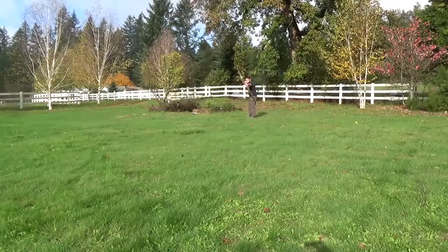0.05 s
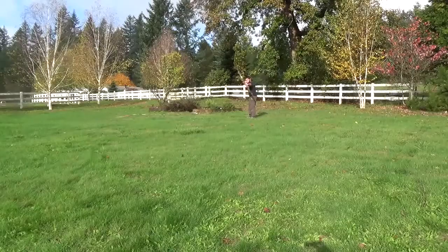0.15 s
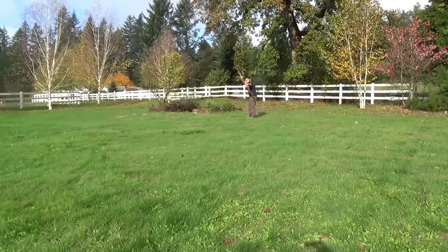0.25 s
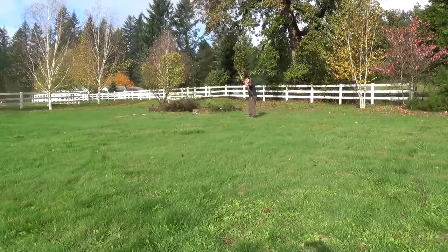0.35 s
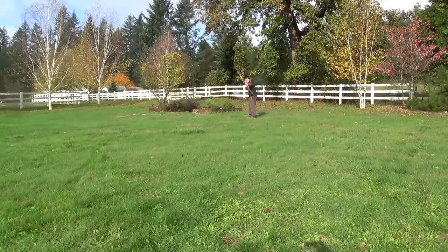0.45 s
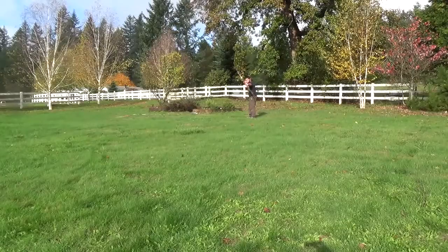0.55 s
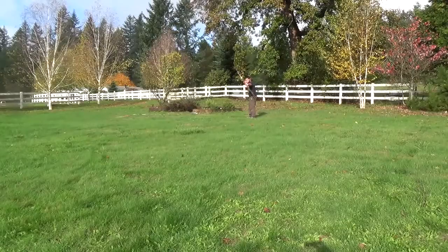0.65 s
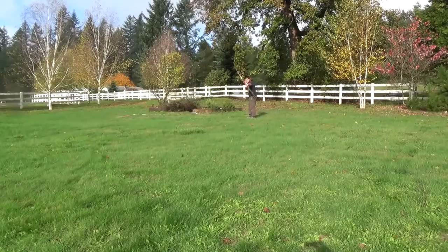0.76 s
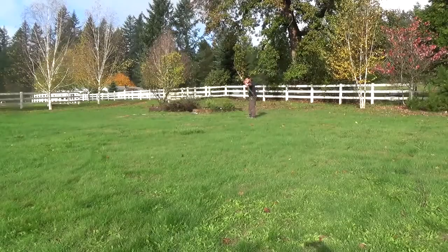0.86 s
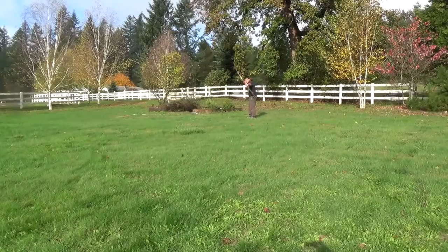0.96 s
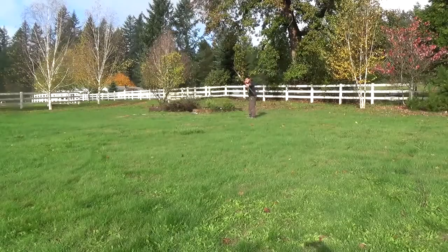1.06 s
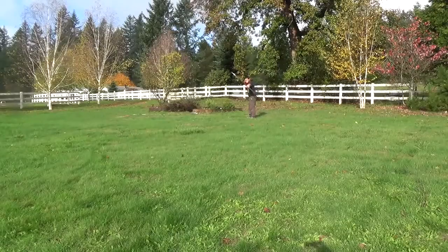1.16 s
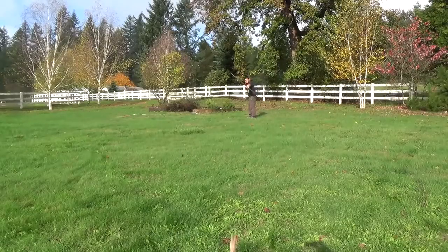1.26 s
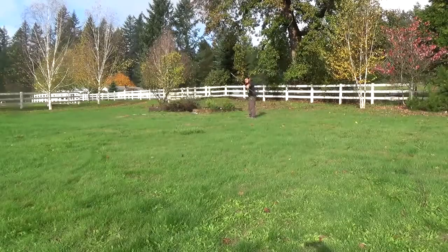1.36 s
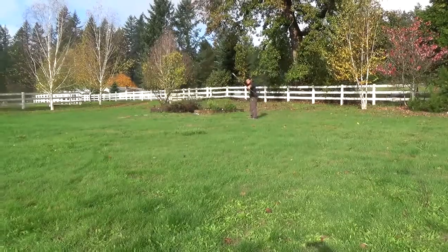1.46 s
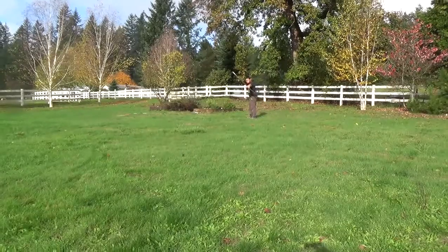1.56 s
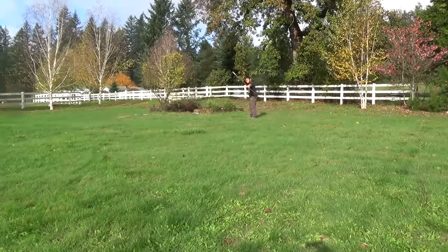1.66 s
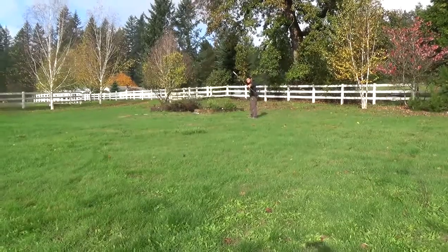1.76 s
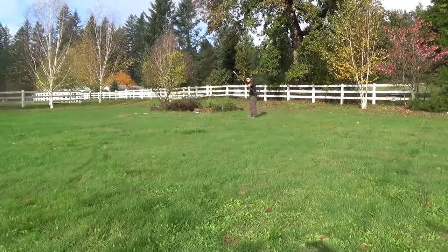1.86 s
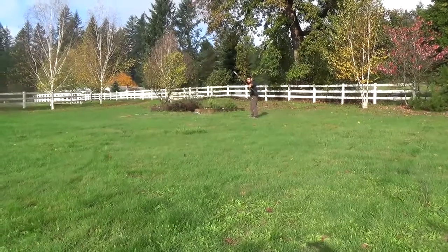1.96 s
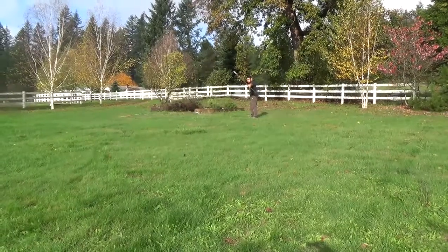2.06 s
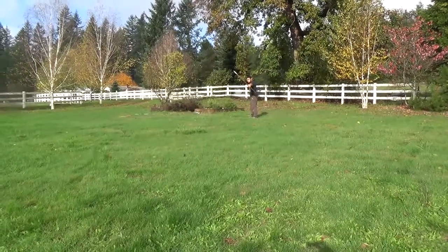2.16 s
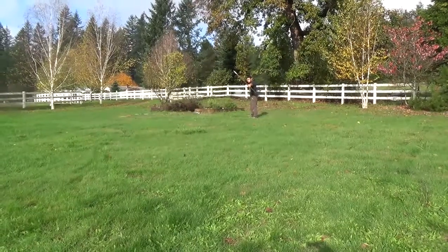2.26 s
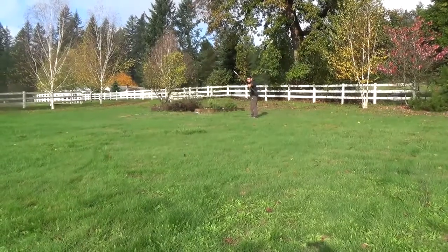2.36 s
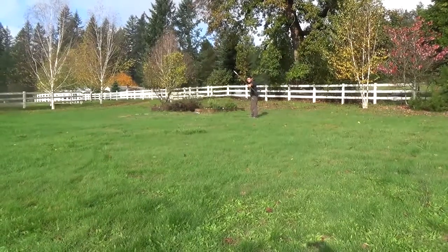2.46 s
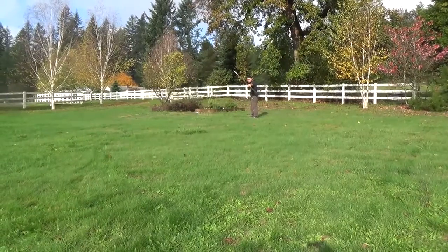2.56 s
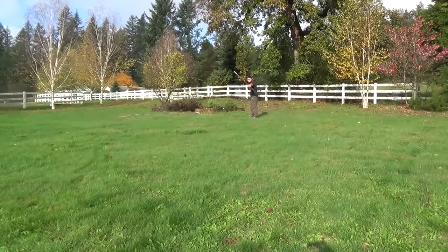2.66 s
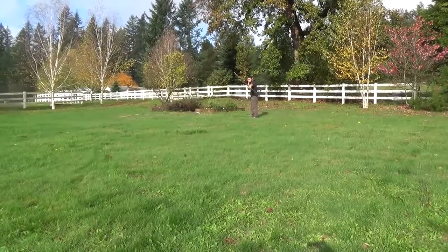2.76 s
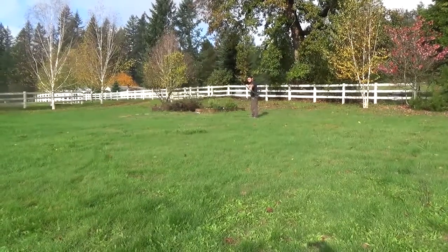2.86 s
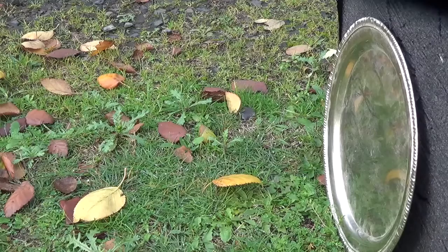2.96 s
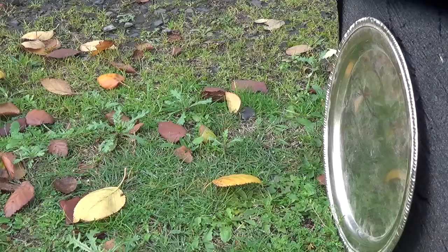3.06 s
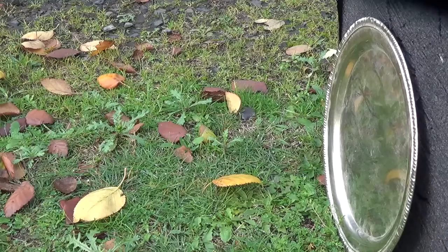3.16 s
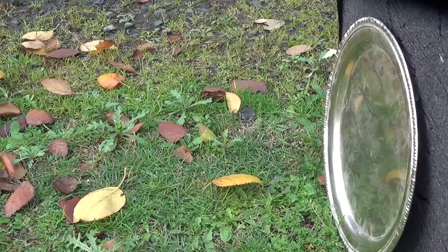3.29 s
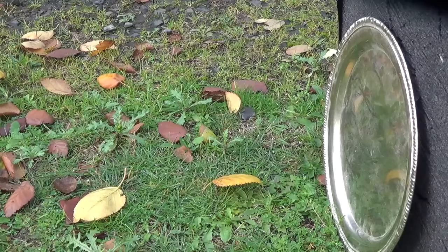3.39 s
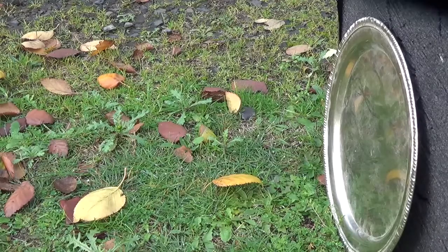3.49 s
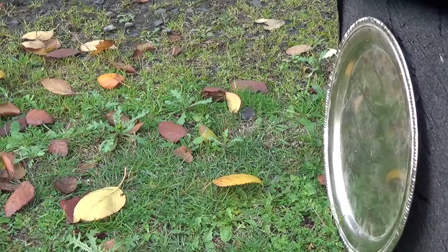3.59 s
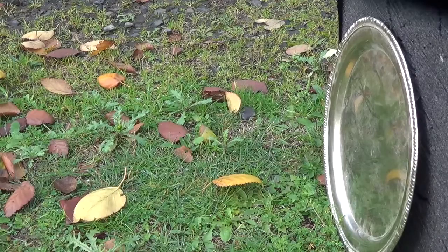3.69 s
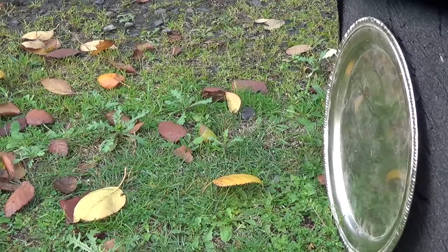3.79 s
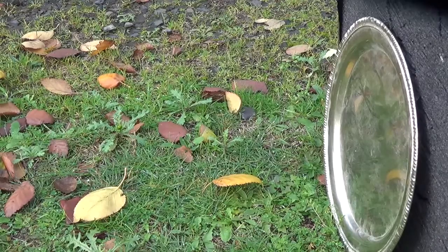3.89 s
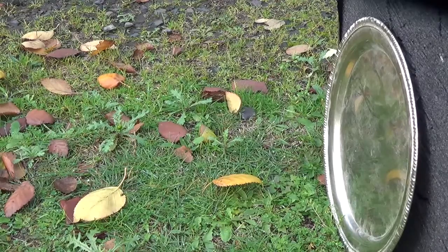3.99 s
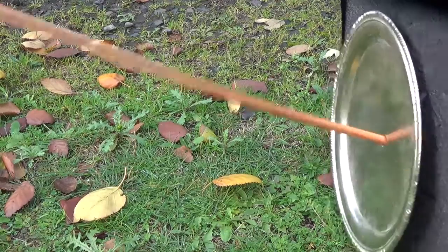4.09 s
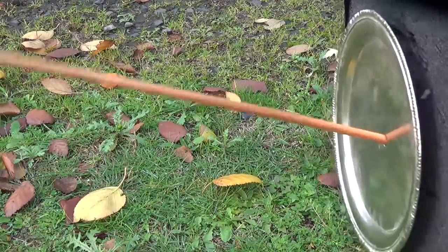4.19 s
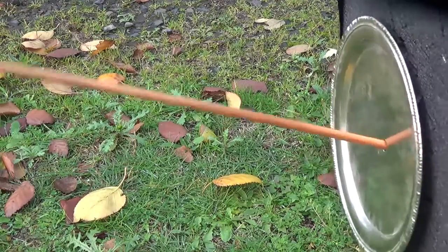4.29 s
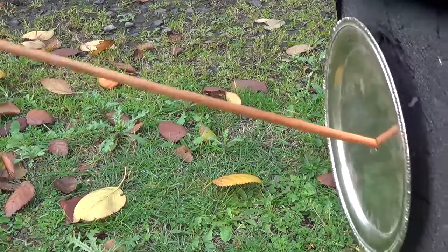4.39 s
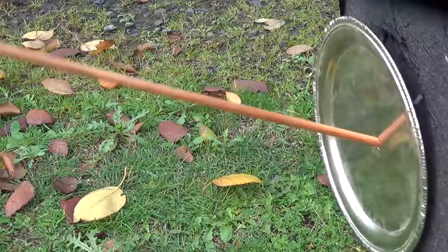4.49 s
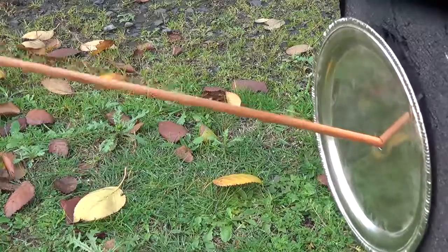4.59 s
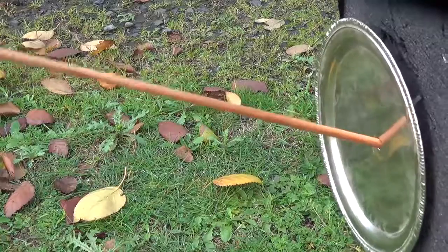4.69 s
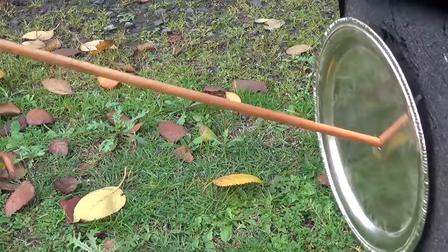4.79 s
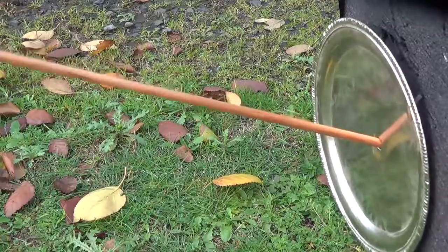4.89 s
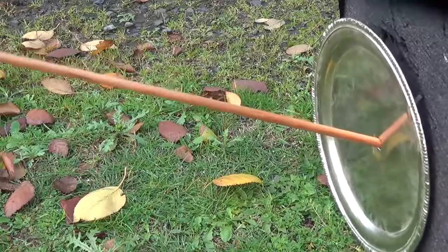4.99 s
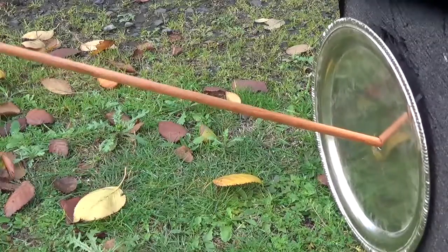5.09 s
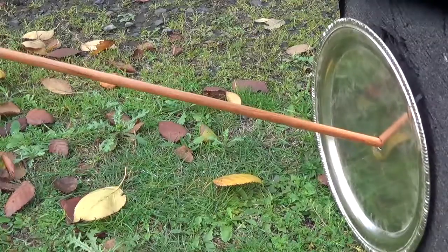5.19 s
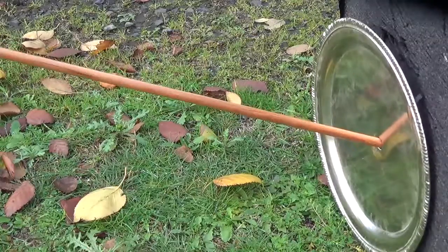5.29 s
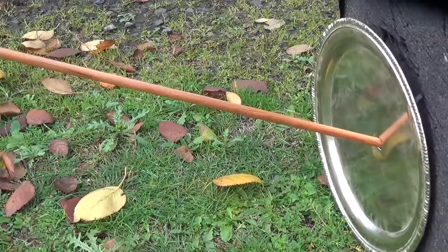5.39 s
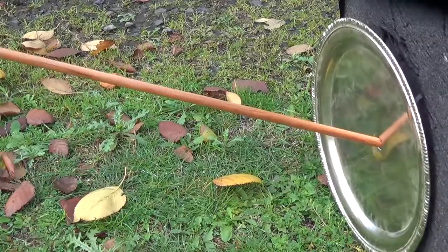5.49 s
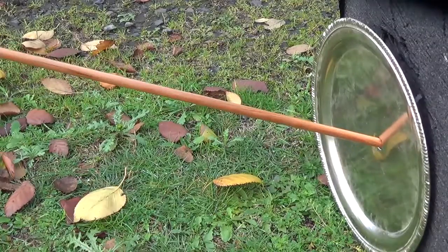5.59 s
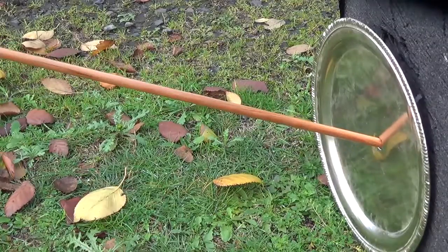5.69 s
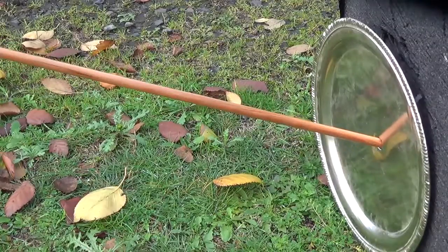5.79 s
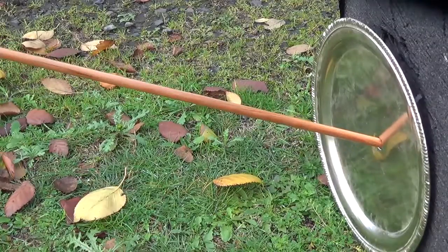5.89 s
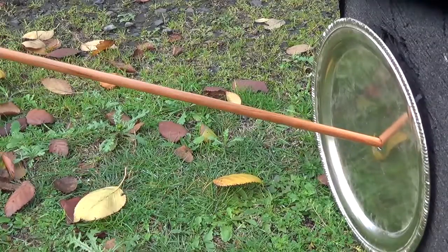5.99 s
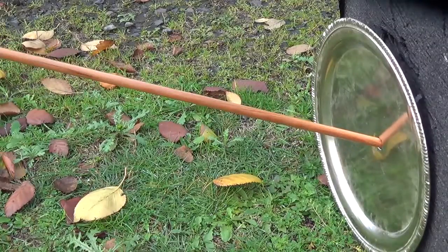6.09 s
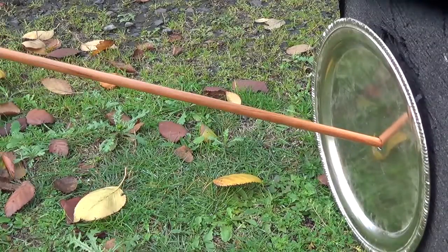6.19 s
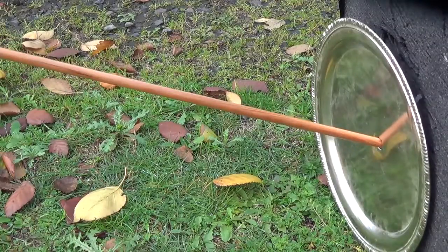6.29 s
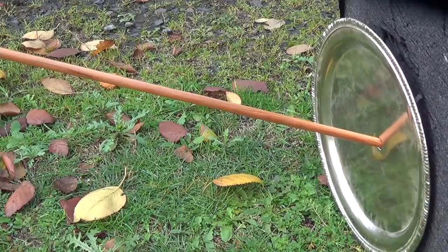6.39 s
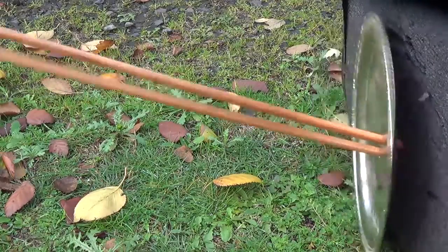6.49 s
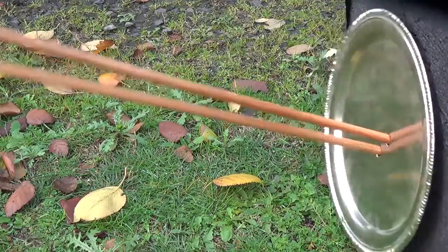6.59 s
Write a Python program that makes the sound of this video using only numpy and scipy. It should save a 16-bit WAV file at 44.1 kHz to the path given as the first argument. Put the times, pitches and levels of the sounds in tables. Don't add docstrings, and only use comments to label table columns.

```python
import sys
import numpy as np
from scipy import signal
from scipy.fft import rfft, irfft, next_fast_len
from scipy.io import wavfile
from scipy.ndimage import uniform_filter1d, map_coordinates

SR = 44100
rng = np.random.default_rng(int(sys.argv[2]) if len(sys.argv) > 2 else 0)


def decibels_to_gain(level_db):
    exponent = np.asarray(level_db, float) / 20
    return 10 ** exponent


def unload_wav(signal):
    wavfile.write(
        sys.argv[1],
        SR,
        np.round(np.clip(np.atleast_2d(signal).T, -1, 1) * 32767).astype(np.int16),
    )


N = 293265
MOVE_S = 3.005

# (frequency [Hz], density [dB per Hz])
FEATHERS = [(470, -34.5), (800, -7), (4780, -4), (7740, -8), (9860, -3.5), (11000, -2), (14300, -31.5),
            (22000, -120)]


def unit(x):
    return x / np.sqrt(np.mean(x ** 2) + 1e-20)


def along(points, hz):
    f, v = np.transpose(points)
    return np.interp(np.log(hz + 1), np.log(f + 1), v)


def since(s):
    return np.clip(np.arange(N) / SR - s, 0, None)


def filtered(x, response):
    m = next_fast_len(x.shape[-1] + 8192)
    return irfft(rfft(x, m) * response(np.fft.rfftfreq(m, 1 / SR)), m)[..., :x.shape[-1]]


def resonances(peaks):
    def response(f):
        total = 0
        for k, (c, width, db) in enumerate(peaks):
            total = total + (-1) ** k * decibels_to_gain(db) * 1j * f * width / (c * c - f * f + 1j * f * width)
        return total
    return response


def noise(spectrum, alike, grain_db=0, size=N):
    lumps = decibels_to_gain(grain_db * unit(uniform_filter1d(rng.standard_normal(size), size=40)))

    def spread(hz):
        turn = np.arccos(np.clip(along(alike, hz), 0, 1)) / 2
        return decibels_to_gain(along(spectrum, hz)) * [np.cos(turn), np.sin(turn)]

    mid, side = filtered(rng.standard_normal((2, size)) * lumps, spread)
    return np.pad(unit(np.array([mid + side, mid - side])), ((0, 0), (0, N - size)))


def ring(modes, seconds):
    t = np.arange(int(seconds * SR)) / SR
    hz, db, t60 = np.transpose(modes)[:, :, None]
    return np.sum(decibels_to_gain(db - 60 * t / t60) * np.sin(2 * np.pi * hz * t), axis=0)


def add(track, s, x):
    part = track[..., round(s * SR):round(s * SR) + x.shape[-1]]
    part += x[..., :part.shape[-1]]


def lean(x, balance):
    return filtered(x, lambda hz: decibels_to_gain(np.outer([.5, -.5], along(balance, hz))))


def lawn(x):
    t = np.arange(SR // 10) / SR
    tail = rng.standard_normal((2, len(t))) * decibels_to_gain(-60 * t / .055)
    return x + decibels_to_gain(-11) * signal.fftconvolve(x[None], tail / np.linalg.norm(tail[0]), axes=1)[:, :N]


def air():
    # (frequency [Hz], density [dB per Hz])
    hiss = [(1180, -30), (2000, -7.5), (2840, -4.5), (3070, 0.5), (7220, -3.5), (11000, -4.5), (14300, -37),
            (22000, -120)]
    rumbles = [
        [(15, -47.5), (25, -16.5), (97, 0), (125, -6), (156, -14.5), (220, -16.5), (290, -49.5), (480, -120)],
        [(15, -73.5), (25, -45.5), (43, -30.5), (52, -12.5), (71, -1.5), (92, 1.5), (135, -16.5), (220, -20.5),
         (290, -46.5), (480, -120)],
    ]
    traffics = [
        [(71, -31.5), (120, -0.5), (211, -13), (236, -8), (309, -9.5), (446, -10.5), (853, -8), (2290, -17.5),
         (3500, -24), (4550, -51), (7700, -120)],
        [(71, -33.5), (120, -2), (240, -4), (263, -10), (429, -13), (494, -13), (615, -11.5), (1130, -9.5),
         (2600, -20), (3380, -46.5), (5720, -120)],
    ]
    # (frequency [Hz], left-right likeness [0-1])
    alike = [(60, 0.71), (170, 0.93), (490, 0.84), (1410, 1), (4030, 0.63), (11500, 0.65)]
    # (frequency [Hz], left minus right [dB])
    balances = [
        [(60, -5.5), (170, -1.5), (490, -1.0), (1410, -1), (4030, -0.5), (11500, 1)],
        [(60, -14), (170, -2.5), (490, -2), (1410, -3), (4030, 0.5), (11500, -0.5)],
    ]
    # (time [s], strength [dB])
    passing = [(0, -1.5), (.15, -3), (.48, 0.5), (.72, -1), (2.1, .5), (2.95, -1.5), (3.05, -1), (4.9, 1),
               (5.6, -4), (6.07, -7.5), (6.5, -1.5)]
    # (rumble [dB], traffic [dB], hiss [dB])
    spot_levels = [
        (-69.5, -68.5, -74),
        (-73, -70, -78),
    ]
    follows = (1, .15, .05)
    t = np.arange(N) / SR
    after = t > MOVE_S
    swell_db = np.interp(t, *np.transpose(passing))
    out = 0
    for levels, rumble, traffic, balance, here in zip(spot_levels, rumbles, traffics, balances, (~after, after)):
        for db, share, spectrum, grain_db in zip(levels, follows, (rumble, traffic, hiss), (1, 1, .6)):
            layer = lean(noise(spectrum, alike, grain_db), balance)
            out = out + here * decibels_to_gain(db + share * swell_db) * layer
    return out


def engine():
    # (time [s], firing rate [Hz], level [dB])
    revs = [(3.0, 78.66, -69.5), (3.45, 79.22, -67), (3.75, 79.6, -65.5), (4.1, 87, -72), (4.4, 89.9, -71),
            (5.0, 96.8, -74.5), (5.2, 96.63, -77.5), (5.35, 91, -72), (5.9, 84.15, -87.5)]
    t = np.arange(N) / SR
    s, hz, db = np.transpose(revs)
    unsteady_db = .8 * map_coordinates(rng.standard_normal(64), [8 * t])
    phase = 2 * np.pi * np.cumsum(np.interp(t, s, hz)) / SR
    heard = (t > MOVE_S) * (t < s[-1])
    tone = decibels_to_gain(np.interp(t, s, db) + 6.5 + unsteady_db) * np.sin(phase) * heard
    return tone * decibels_to_gain([[-15.5], [0]])


def camera():
    # (frequency [Hz], level [dB], t60 [s])
    ticks = [
        [(2900, -72, .026), (3300, -72, .018)],
        [(2880, -69.5, .028), (3300, -80, .016)],
    ]
    frame_hz = 30 / 1.001
    out = np.zeros(N)
    for k in range(round(MOVE_S * frame_hz), round(N / SR * frame_hz)):
        modes = [(hz, db + rng.normal(0, 1.8), t60) for hz, db, t60 in ticks[k % 2]]
        add(out, (k + .44) / frame_hz, ring(modes, .04))
    return out


def crowd(jagged_db, size):
    # (frequency [Hz], level [dB])
    weak_modes = [(71, -58), (120, -25), (179, -16), (675, -19), (1110, -5.5), (1710, -21.5), (1950, -9.5),
                  (2360, -10), (3100, -3.5), (4590, -4), (4950, -8), (11200, -5), (14600, -40.5),
                  (22000, -120)]
    # (frequency [Hz], t60 [s])
    damping = [(150, 0.37), (1000, .42), (3000, 0.35), (6000, .26), (8000, .21), (11000, 0.21)]
    hz, t, z = signal.stft(rng.standard_normal((2, size)), SR, nperseg=1024, noverlap=896)
    z = z * decibels_to_gain(along(weak_modes, hz) + jagged_db)[:, None]
    z = z * decibels_to_gain(-60 * t / along(damping, hz)[:, None])
    return signal.istft(z, SR, nperseg=1024, noverlap=896)[1][:, :size]


def tray():
    # (time [s], ring [dB], tear [dB], extra left [dB], rim [dB])
    strikes = [
        (4.1677, 1.5, -19.5, 0.5, -35.5),
        (6.5787, -1, -20.5, 2.5, -32),
    ]
    # (frequency [Hz], level a quarter second after the blow [dB], t60 [s])
    strong_modes = [(195, -60, 0.7), (565, -60, 0.45), (735, -56.5, 1.1), (921, -55, 0.4),
                    (1005, -52, 0.42), (1120, -54, 0.36), (1216, -57, 0.38), (1373, -59, 0.51),
                    (1631, -61, 0.45), (1950, -43.5, 0.52), (2169, -61, 0.43), (2293, -59, 0.47),
                    (2522, -56, 0.38), (2859, -51, 0.45), (2988, -49, 0.4), (3160, -54, 0.38),
                    (3259, -53, 0.36), (3457, -58, 0.33), (3595, -57, 0.34), (3815, -59, 0.3),
                    (3967, -62, 0.31), (4231, -63, 0.31), (4463, -64, 0.28), (4644, -57, 0.31),
                    (4716, -63, 0.28), (5082, -66, 0.3), (5879, -67, 0.27), (6228, -67, 0.29),
                    (6643, -69, 0.26), (8565, -78, 0.21)]
    # (frequency [Hz], density [dB per Hz])
    rim_spectrum = [(100, -27.5), (200, -5), (600, -3.5), (1100, -2), (2500, -9.5), (5000, -18.5),
                    (11000, -39)]
    # (frequency [Hz], left minus right [dB])
    balance = [(60, -10.5), (220, -9.5), (830, -3), (3100, -3), (11500, -3)]
    out, t = np.zeros((2, N)), np.arange(SR * 3 // 4) / SR
    jagged_db = 4 * rng.standard_normal(513)
    chatter = noise(rim_spectrum, [(1000, 0.985)], grain_db=3.5, size=2 * SR)
    tearing = resonances([(900, 6000, 1.5), (1900, 730, -2.5), (8988, 6800, -3)])
    gain_db = np.minimum(-19.5 + 100.5 * t, -3.5 + 14.5 * t)
    fade = np.minimum((t[-1] - t) / 0.1075, 1)
    hz, db, t60 = np.transpose(strong_modes)[:, :, None]
    for k, (s, ring_db, tear_db, left_db, rim_db) in enumerate(strikes):
        chance = rng.random((len(strong_modes), 3))
        split_hz = np.sign(chance[:, :1] - .5) * (26 + 14 * chance[:, 1:2]) * np.minimum(hz / 1900, 1)
        pair = 1 + decibels_to_gain(-7) * np.exp(2j * np.pi * (split_hz * t + chance[:, 1:2]))
        knots = rng.standard_normal((len(strong_modes), 32))
        rocking = decibels_to_gain(2 * np.array([map_coordinates(row, [40 * t]) for row in knots]))
        tones = np.imag(pair * np.exp(2j * np.pi * (hz * t + chance[:, 2:])))
        modes = decibels_to_gain(db - 60 * (t - .24) / t60) * rocking * tones
        modes = modes * decibels_to_gain(-0.5) * (1 - 0.92 * np.exp(-t / 0.034))

        weak, side = crowd(jagged_db, size=len(t))
        mid = modes.sum(axis=0) + decibels_to_gain(6) * weak
        side = decibels_to_gain(-6.5) * side
        body = decibels_to_gain(ring_db + gain_db) * np.array([mid + side, mid - side])
        rim = decibels_to_gain(rim_db - 60 * t / .92) * chatter[:, k * SR:k * SR + len(t)]
        tear = decibels_to_gain(tear_db - 60 * t / 0.0098) * filtered(rng.standard_normal(len(t)), tearing)
        direct = (body + rim + tear) * fade * decibels_to_gain([[left_db / 2], [-left_db / 2]])

        trees = rng.standard_normal((2, len(t))) * decibels_to_gain(-60 * t / 1.2)
        answer = signal.fftconvolve(direct, trees / np.linalg.norm(trees[0]), axes=1)[:, :len(t)]
        add(out, s, direct + decibels_to_gain(-33) * answer)
    return lean(out, balance)


def flight():
    # (loosed [s], gone by [s], level when nearest [dB])
    flights = [
        (1.16, 1.389, -55),
        (4.14, 4.16, -55),
        (6.551, 6.572, -47.5),
    ]
    t = np.arange(N) / SR
    nearing = 0
    for start, end, db in flights:
        nearing = nearing + decibels_to_gain(db) * (t > start) * (t < end) / (1 + np.abs(end - t) / .03)
    return nearing * noise(FEATHERS, [(1000, 0.9234)], grain_db=1.5)


def knock(hz, crack_db, ring_db, thud_db, t60):
    # (frequency [Hz], width [Hz], level [dB])
    turf = [(228.8, 183, 1), (446.5, 580, -8.5)]
    t = np.arange(SR // 8) / SR
    shaft_note = resonances([(hz, 0.16 * hz, 0)])
    layers = [  # (dB, t60 s, rise s, body)
        (crack_db, .008, .0003, resonances([(6500, 75000, 0)])),
        (ring_db, 0.99 * t60, .0008, lambda f: shaft_note(f) / (1 + 1j * f / (1.9 * hz))),
        (thud_db - 3, 1.245 * t60, .001, resonances(turf))]
    out = 0
    for db, decay_s, rise_s, body in layers:
        push = rng.standard_normal(len(t)) * decibels_to_gain(-60 * t / decay_s) * (1 - np.exp(-t / rise_s))
        x = filtered(push, body)
        out = out + decibels_to_gain(db) * x / np.abs(x).max()
    return out


def clatter():
    # (time [s], level [dB], frequency [Hz], t60 [s])
    stop = [
        (1.4, -10.5, 722, .012),
    ]
    # (frequency [Hz], level [dB], t60 [s])
    shaft = [(113, -17, 0.083), (193.6, -15, 0.056), (298, -11, 0.21), (500, 5, 0.04), (608, -18.5, 0.045)]
    # (time [s], ring [dB], ring frequency [Hz], crack over ring [dB])
    clacks = [(1.2354, -54.5, 970, -12), (1.4696, -41, 1530, -26), (1.4766, -41.5, 1060, -28.5),
              (1.5072, -42, 1150, 0.5), (1.5238, -24, 801, 4), (1.5268, -24, 900, 7),
              (1.5314, -28, 2103, -1.5), (1.5425, -28.5, 2100, -4), (1.5553, -38, 1067, -1),
              (1.56, -39.5, 2090, 0), (1.5748, -31, 1062, -0.5), (1.5777, -31, 1784, -2),
              (1.5915, -32.5, 2135, 3.5), (1.6213, -35, 4250, 5), (1.6344, -39.5, 1612, 0.5),
              (1.6413, -42, 998, -12), (1.6555, -51, 1026, -10), (1.6931, -57, 3480, -2.5),
              (1.8115, -54.5, 3360, 9), (1.8545, -37, 608, -28), (1.8615, -43, 1245, -19),
              (1.9937, -60, 740, 7.5)]
    # (time [s], thud [dB])
    thuds = [(1.53, -24.5), (1.56, -29.5), (1.577, -34), (1.7159, -57.5), (1.7415, -51), (1.752, -46),
             (1.788, -42), (1.8538, -35), (1.8782, -44.5), (1.8983, -51.5), (2.004, -50), (4.7999, -54)]
    out = np.zeros(N)
    for s, db, hz, t60 in stop:
        add(out, s, ring([(hz, db, t60)], .04))
        add(out, s, decibels_to_gain(db - 10) * ring(shaft + [(103, -23, 0.59)], 0.27))
    for s, db, hz, crack_db in clacks:
        t60 = 0.026 + .012 * max(db + 34.5, 0) / 10
        add(out, s, knock(hz, db + crack_db, db, db - 7.5, t60))
    for s, db in thuds:
        add(out, s, knock(824.9, db - 23, db - 13.5, db, 0.043))
    return out


def crunch():
    # (frequency [Hz], density [dB per Hz])
    grit = [(88, -29.5), (150, -9), (1140, -2.5), (2480, -1.5), (3880, -13.5), (4560, -6), (5080, -11.5),
            (5760, -11), (11000, -12), (14300, -45.5), (22000, -120)]
    enters_s, halts_s = 1.3902, 1.4
    u = since(enters_s)
    grind = decibels_to_gain(-19 - 800 * u - 3800 * since(halts_s))
    bite = 1 + decibels_to_gain(4.5 - 60 * u / .014)
    return grind * bite * (1 - np.exp(-u / .0002)) * noise(grit, [(1000, 0.953)], grain_db=-2.5, size=2 * SR)


def slide():
    # (start [s], end [s])
    span = (1.504, 1.645)
    # (frequency [Hz], density [dB per Hz])
    leaves = [(120, -25.5), (200, 2.5), (680, -5.5), (1070, -4), (4450, -17), (4920, -11.5), (11000, -24.5),
              (14300, -53), (22000, -120)]
    start, end = span
    sweep = decibels_to_gain(-47.5 - 60 * since(1.522) / .2) * noise(FEATHERS, [(1000, 0.9954)], grain_db=3.5, size=2 * SR)
    drag = decibels_to_gain(-58) * noise(leaves, [(1000, 0.988)], grain_db=1.5, size=2 * SR)
    return (sweep + drag) * (1 - np.exp(-since(start) / 0.004)) * decibels_to_gain(-700 * since(end))


def landing():
    # (frequency [Hz], left minus right [dB])
    balance = [(60, -8.5), (220, -4.5), (830, 2), (3100, -1), (11500, -0.5)]
    return lean(lawn(clatter()) + crunch() + slide(), balance)


def bow():
    # (start [s], end [s], frequency [Hz], width [Hz], level [dB])
    draws = [
        (0.27, 0.538, 1092, 150, -69.5),
        (0.905, 1.042, 1115, 200, -75),
        (6.101, 6.581, 2622, 220, -75.5),
    ]
    # (time [s], string scrape [dB], delay to slap [s], slap [dB], limbs [dB])
    looses = [
        (1.140, -50.5, .014, -40.5, -50),
        (4.121, -41, .0145, -24, -32.5),
        (6.531, -39, .016, -36.5, -33.5),
    ]
    # (frequency [Hz], width [Hz], level [dB])
    fingers = [(2100, 780, 0.5), (3780, 1300, -10.5), (900, 540, -5.5)]
    # (frequency [Hz], level [dB], t60 [s])
    limbs = [(188.9, 1.5, 0.1), (95, -10, .08), (408, -9.5, .05)]
    out, t = np.zeros(N), np.arange(SR // 10) / SR
    for start, end, hz, width, db in draws:
        squeak = resonances([(hz, width, 0)])
        size = int((end - start) * SR)
        rub = unit(filtered(rng.standard_normal(size), lambda f: squeak(f) ** 2))
        add(out, start, decibels_to_gain(db) * np.hanning(size) ** 0.31 * rub)

    clear_s = .037
    string = resonances(fingers)
    for s, scrape_db, delay, slap_db, limb_db in looses:
        scrape = unit(filtered(rng.standard_normal(len(t)), lambda f: string(f) / (1 + 1j * f / 4500) ** 2))
        add(out, s, decibels_to_gain(scrape_db - 60 * t / 0.07) * (t < clear_s) * scrape)
        add(out, s + delay, decibels_to_gain(scrape_db - 60 * t / .05) * (t < clear_s - delay) * scrape[::-1])
        slap = decibels_to_gain(slap_db + 6.5 - 60 * t / 0.018) * (1 - np.exp(-t / 0.0026)) ** 2
        add(out, s + delay, slap * rng.standard_normal(len(t)))
        add(out, s + delay + 0.0042, decibels_to_gain(limb_db) * ring(limbs, .25))
    return out


def scene():
    near = flight() + tray() + landing() + lawn(bow())
    return air() + engine() + camera() + filtered(near, lambda hz: (1j * hz / (1j * hz + 75)) ** 2)


def roll_off(x):
    return signal.sosfilt(signal.butter(12, 12140, fs=SR, output="sos"), x)


def record(dry):
    def half_rate(hz):
        over = hz - 11011
        return decibels_to_gain(-60 * np.clip(over / 700, 0, 1) ** .5 - 12 * np.clip(over / 3000, 0, 4))

    return roll_off(filtered(dry, half_rate))


dry = scene()
out = record(dry)
unload_wav(out)
```